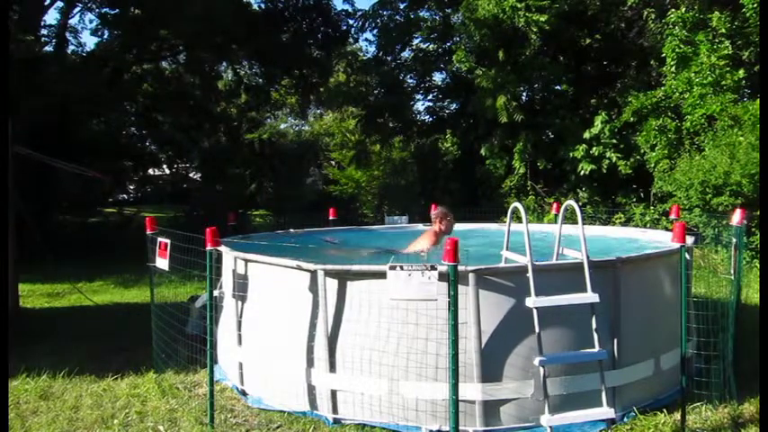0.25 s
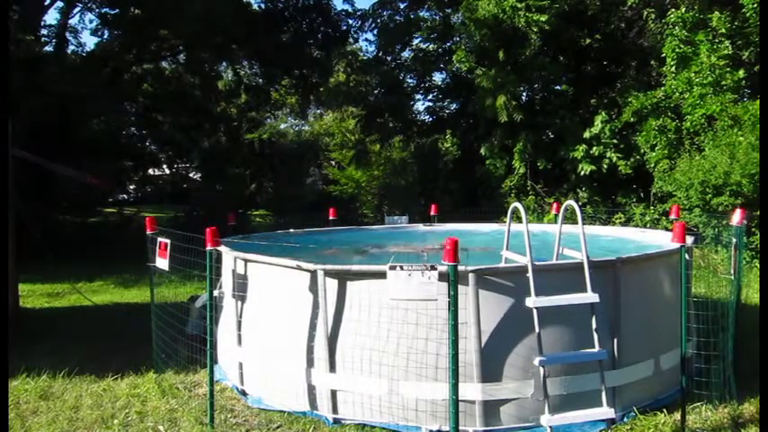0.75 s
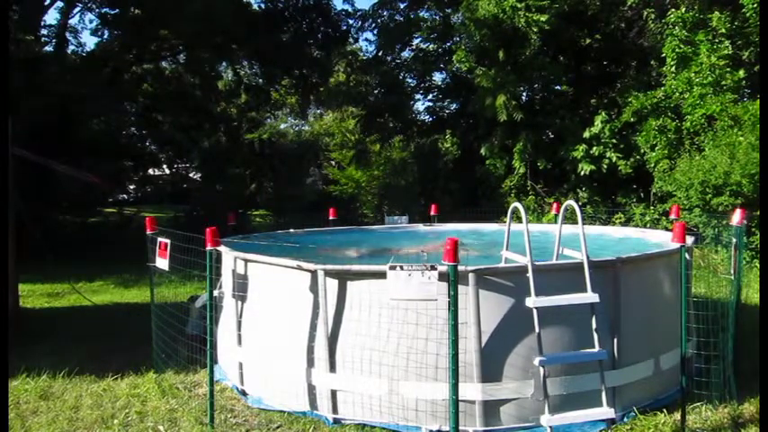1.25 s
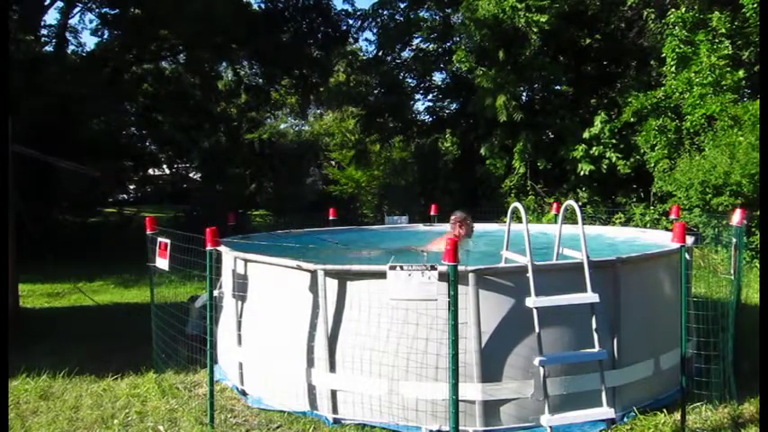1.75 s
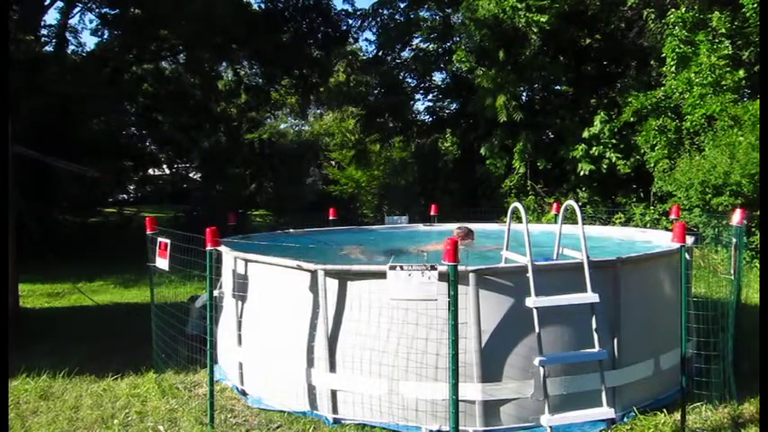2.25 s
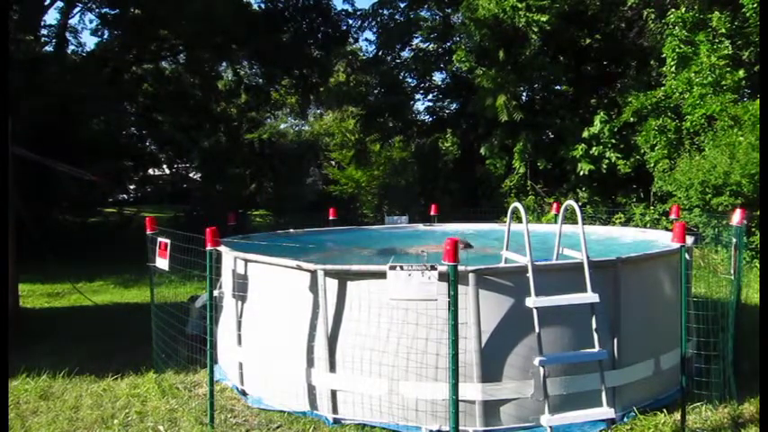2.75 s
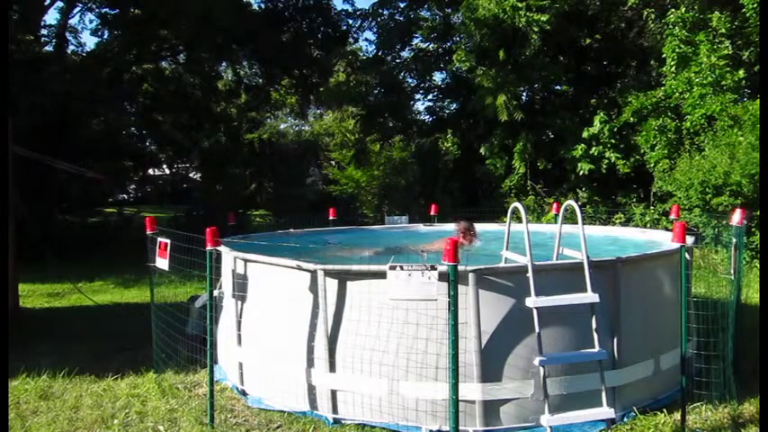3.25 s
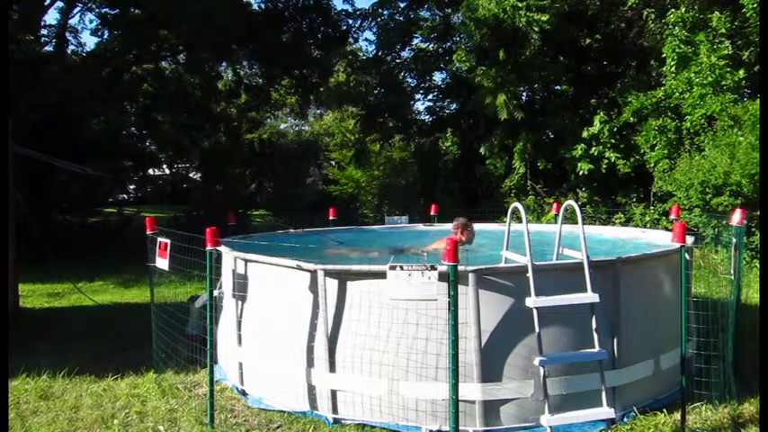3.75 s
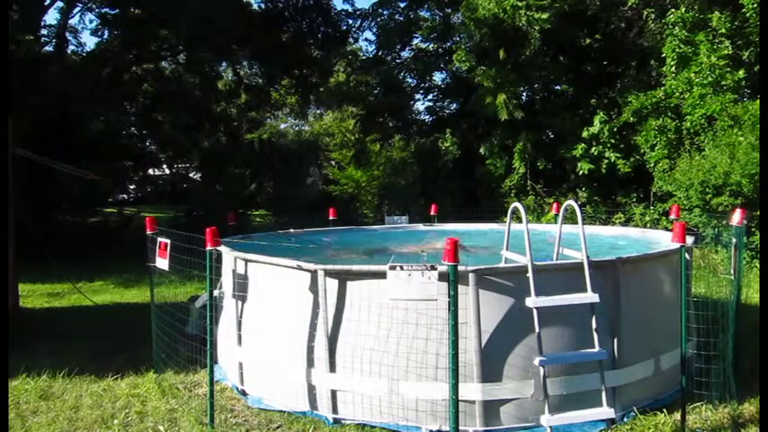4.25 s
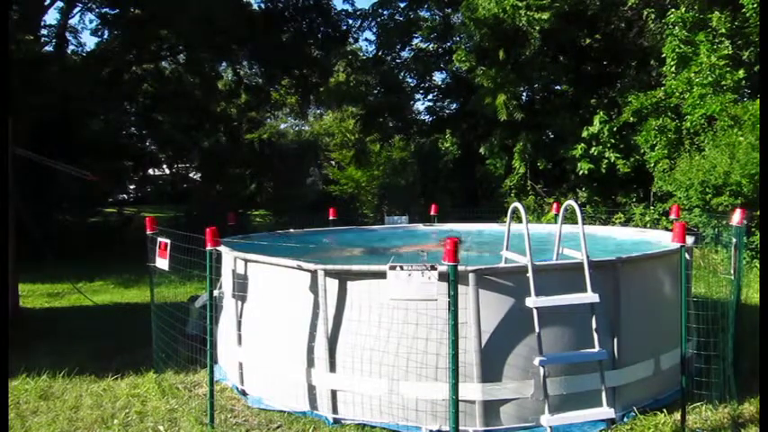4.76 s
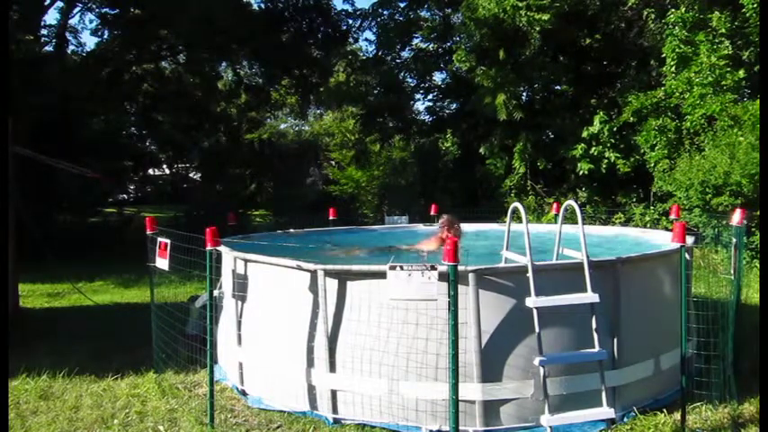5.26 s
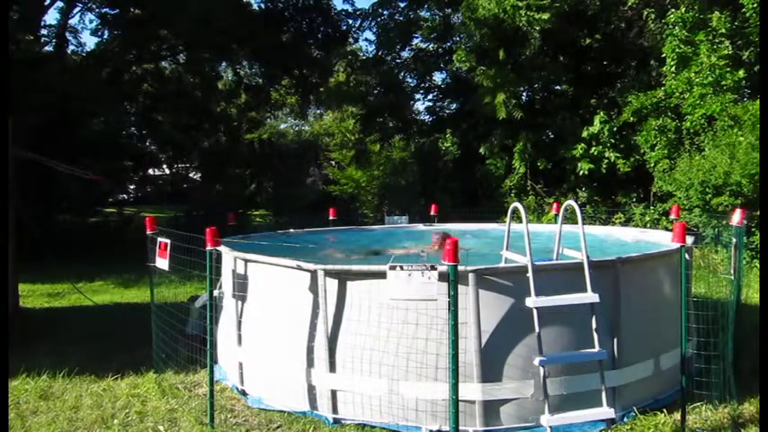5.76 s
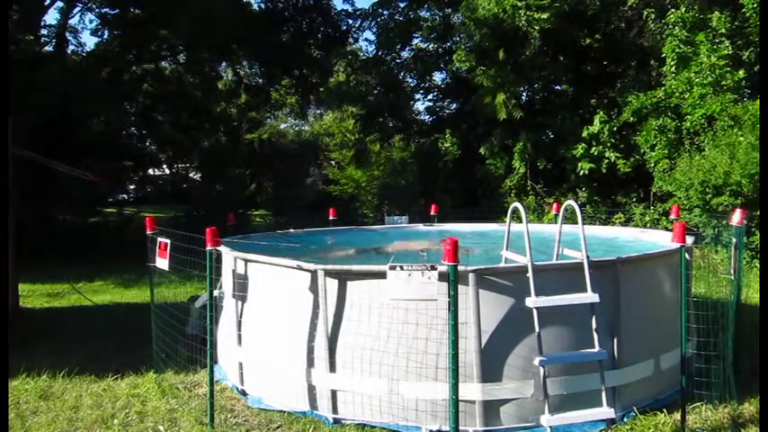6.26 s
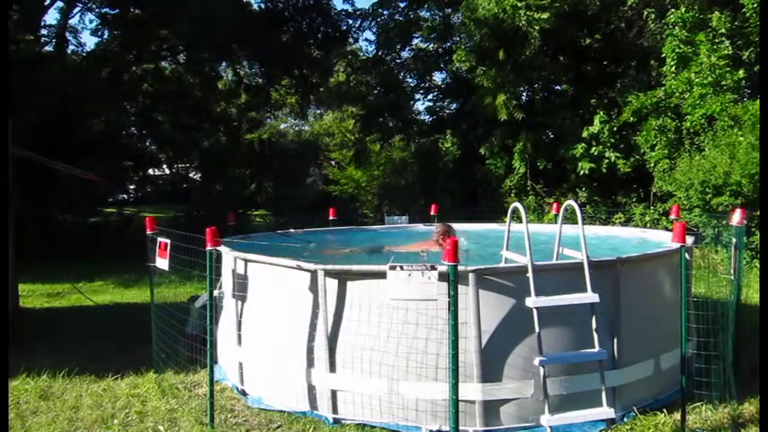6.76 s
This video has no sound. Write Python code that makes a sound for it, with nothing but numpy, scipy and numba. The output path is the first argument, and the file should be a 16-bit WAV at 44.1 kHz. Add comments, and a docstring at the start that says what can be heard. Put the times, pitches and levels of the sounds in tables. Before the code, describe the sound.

Outdoor stereo sound at moderate distance: splashing strokes in a small pool, with bright plinking drops, hissing spray and occasional bubble pops. Activity is frequent at first, pauses near three seconds, surges again, then thins before one last sharp splash. A bird repeats quick falling chirps to the right, a farther one whistles briefly, and another answers on the left. Low pump hum and rumble stay faint.

```python
"""Drops smack the water at once, spray fizzes and air pockets burst as a swimmer strokes on the spot
in a garden pool, heard from across the lawn; three birds sing and a pump hums over far rumble.
Drops and air pockets are damped sines of rising pitch, foam and garden air are banded noise.
Bird notes are gliding near-sines with scattered echoes; the pump is a set of wavering hum lines."""
import sys
import numpy as np
from scipy import signal
from scipy.io import wavfile
from numba import njit

SR = 44100
rng = np.random.default_rng(int(sys.argv[2]) if len(sys.argv) > 2 else 0)


def pcm_store(signal):
    """Save signal as 16-bit PCM."""
    levels = np.round(np.clip(np.atleast_2d(signal), -1, 1) * 32767)
    wavfile.write(sys.argv[1], SR, levels.astype(np.int16).T)


N = 309582

# Table levels are relative: the functions add their own gains.
# Drops and slaps on the surface: (time [s], peak level [dB], starting pitch [Hz])
SLAPS = [(0.0113, -22, 1510), (0.0486, -11.5, 3640), (0.2089, -24, 3860), (0.3298, -21, 3940),
         (0.337, -24, 2020), (0.4518, -26, 1220), (0.504, -24, 3460), (0.5541, -26.5, 3900),
         (0.637, -30, 4300), (0.6468, -13, 3994), (0.725, -18.5, 1230), (0.7791, -23, 4700),
         (0.7913, -25, 2540), (0.9403, -16.5, 3360), (1.0207, -24, 4940), (1.1175, -19.5, 2620),
         (1.1747, -25, 3160), (1.2, -25.5, 2470), (1.3132, -28, 2840), (1.4496, -21.5, 4030),
         (1.456, -25, 4500), (1.6903, -19.5, 3370), (1.7128, -26, 3420), (1.7407, -24, 1250),
         (1.8043, -17.5, 3250), (1.832, -18.5, 2000), (1.8477, -18, 3050), (1.9458, -25, 3190),
         (1.979, -17, 3660), (2.1259, -27, 3080), (2.1929, -20.5, 1980), (2.2015, -18, 3200),
         (2.2068, -17.5, 3180), (2.2495, -24, 2780), (2.3202, -16, 2330), (2.331, -22, 3380),
         (2.476, -21.5, 3600), (2.489, -27, 2900), (2.7317, -24, 3300), (3.3605, -19.5, 3100),
         (3.4421, -16.5, 1560), (3.4708, -11.5, 2950), (3.4755, -15, 3740), (3.5124, -12, 4160),
         (3.5299, -22, 2750), (3.571, -17, 3750), (3.6571, -19, 3280), (3.6717, -18.5, 4040),
         (3.7798, -27, 3980), (3.8232, -20, 4650), (3.8346, -19.5, 3460), (4.0447, -27, 5530),
         (4.135, -20.5, 3000), (4.2148, -20, 2780), (4.4092, -22, 2960), (5.162, -22, 2440),
         (5.232, -12, 3340), (5.2799, -21.5, 4820), (5.3592, -19, 4230), (5.5544, -16, 3800),
         (5.8207, -21, 4900), (5.8258, -17.5, 3120), (6.041, -23.5, 2900), (6.2103, -22, 2880),
         (6.256, -23, 2620), (6.306, -22.5, 2620), (6.8753, -24, 2780), (6.986, -15, 4770),
         (6.9912, -10.5, 3370)]
# Large bubbles bursting: (time [s], peak level [dB], starting pitch [Hz])
BURSTS = [(0.191, -32.5, 750), (0.42, -40, 380), (0.465, -37, 425), (0.525, -33, 830), (0.853, -31.5, 900),
          (1.58, -46, 274), (1.627, -39, 680), (1.66, -36, 860), (1.73, -38, 637), (1.826, -31, 593),
          (1.914, -35, 676), (3.113, -42, 268), (3.145, -44, 613), (3.179, -43, 514), (3.206, -32.5, 440),
          (3.654, -26, 883), (3.714, -34, 810), (3.824, -25.5, 672), (4.232, -29.5, 933),
          (5.186, -27, 1440), (5.298, -25, 1470), (5.383, -32, 535), (6.287, -38, 500), (6.64, -39, 328),
          (6.677, -35, 446), (6.75, -35, 345), (6.95, -24, 1180)]
# Air pockets that whoop far upward as they open: (time [s], peak level [dB], starting pitch [Hz])
WHOOPS = [(.492, -35.5, 594), (.863, -31, 690), (1.045, -34, 715), (1.138, -33, 935), (1.303, -37, 844),
          (4.898, -38, 270), (5.022, -39.5, 325)]
# Hard, bright snaps of water on water: (time [s], peak level [dB])
SNAPS = [(0.6464, -32), (0.7282, -40), (0.945, -33), (1.7968, -40), (2.1979, -33), (2.7312, -41),
         (3.657, -29), (3.8357, -37), (4.407, -35), (6.9735, -41)]
# Strokes and kicks that keep the water stirred: (time [s], hold [s], spray level [dB])
STROKES = [(0.05, 0.54, -46.5), (.7, 0.47, -46.5), (1.721, 0.82, -42.5), (3.38, 0.35, -47),
           (4.2, 0.37, -48.5), (5.12, 0.32, -45.5), (5.6, 0.37, -51.5), (5.9, 0.51, -49),
           (6.92, 0.064, -41)]
STROKE_RISE_DB_PER_S, STROKE_FALL_DB_PER_S = 113, 108
# Sheets of thrown water falling back: (time [s], spray level [dB])
SHEETS = [(0.073, -35), (.19, -48), (0.796, -34), (.96, -41.5), (1.857, -34), (2.018, -39.5), (2.2, -44),
          (2.326, -52), (2.62, -45.5), (2.735, -41), (3.392, -41.5), (3.46, -41), (3.52, -38),
          (3.68, -41.5), (3.859, -43.5), (4.23, -38), (5.192, -38.5), (5.56, -45.5), (5.979, -39),
          (6.095, -42), (6.221, -41.5), (6.345, -45), (6.99, -44.5)]
SHEET_RISE_DB_PER_S, SHEET_FALL_DB_PER_S = 222, 208
CALM_DB = -58  # spray between strokes
# Runs of air pockets rising: (time [s], hold [s], level [dB])
GURGLES = [(.46, 0.17, -50), (.92, 0.21, -51), (1.77, 0.25, -49), (2.1, 0.054, -48), (3.14, 0.11, -44),
           (4.88, 0.26, -52.5), (6.64, 0.13, -46)]
GURGLE_RISE_DB_PER_S, GURGLE_FALL_DB_PER_S, GURGLE_CALM_DB = 195, 125, -58
# Spectrum of the foam, also the colour of the fine bubbles: (frequency [Hz], level [dB per Hz])
SPRAY_SPECTRUM = [(300, -19), (500, -3), (800, 4), (1500, 1), (2900, 6.5), (4200, 3), (6300, -6),
                  (7400, -8), (9100, -20), (15500, -24.5)]
# Phrase of five notes, bird on the left; each note: (time in phrase [s], pitch [Hz], level [dB])
LEFT_PHRASE = [
    [(.003, 3160, -1), (.011, 3384, 0.5), (.024, 3490, -4)],
    [(.024, 3054, 1), (.035, 2654, -3.5), (.052, 2280, -6)],
    [(.076, 2300, -3), (.089, 2703, 0.5), (.101, 2840, -6)],
    [(.099, 4053, 1), (.121, 4114, 4.5), (.134, 3520, 4.5), (.154, 3020, 11.5)],
    [(.188, 2468, -6), (.202, 2390, -0.5), (.215, 2086, -7.5), (.24, 1660, -9)],
]
# Phrases of the left bird, the first lacking its three opening notes: (time [s], level [dB])
LEFT_SONGS = [(4.33, -31.5), (4.695, -29), (5.057, -26.5), (5.422, -28)]
# Slur down and quick chip, bird on the right; each note: (time in phrase [s], pitch [Hz], level [dB])
RIGHT_PHRASE = [
    [(0, 2617, 6), (.016, 2505, 3.5), (.026, 2250, 7), (.042, 2070, -2)],
    [(.03, 3700, -6), (.045, 3550, 5), (.051, 2934, 8), (.059, 2500, 2)],
]
# Phrases of the right bird: (time [s], level [dB])
RIGHT_SONGS = [(2.298, -36), (2.424, -38), (2.551, -35.5), (2.678, -35.5), (2.815, -35.5), (2.97, -37),
               (3.14, -38)]
# Plain whistles of a farther bird:
# (time [s], length [s], first pitch [Hz], last pitch [Hz], first level [dB])
WHISTLES = [(3.02, 0.25, 3030, 3015, -52), (3.943, 0.057, 3060, 3050, -42),
            (4.034, 0.052, 3040, 2995, -45.5)]
WHISTLE_FADE_DB = 4  # over each note
# Hum lines of the pump: (frequency [Hz], level [dB])
HUM_LINES = [(150.5, -2), (118.4, -10), (238.8, -9), (418.4, -1)]
# Course of the pump and low rumble: (time [s], level [dB])
PUMP_COURSE = [(0, -59), (2, -60), (3, -56), (6.4, -57), (7.02, -59)]
# Spectrum of the garden air: (frequency [Hz], level [dB per Hz])
GARDEN_SPECTRUM = [(40, -6), (133, -6), (284, -7.5), (425, -5), (710, -6), (1730, -8), (3300, -6),
                   (6660, -17.5), (9200, -18), (15800, -43)]
GARDEN_DB = -45
# Likeness of left and right noise: (frequency [Hz], correlation [-1 to 1])
LIKENESS = [(28, 0.25), (60, 0.9), (200, 0.57), (1650, 0.64), (5000, -0.37), (9000, -0.43), (15000, -0.55)]
# Balance of the two sides: (frequency [Hz], left minus right [dB])
TILT = [(30, 3.5), (120, 0), (700, -0.3), (2000, -3.5), (5000, 3), (9000, 5.5), (15000, -20)]
CUTOFF_HZ = 15850


def water():
    """Superposition: foam hiss, swarms of bubbles and single smacks add as independent sources."""
    spray_db, gurgle_db = stirring()
    foam = amp(spray_db - 3.0) * banded_noise(SPRAY_SPECTRUM, patchy_db=1.0)
    fizz = swarm(spray_db + 3.0, 917, 8380, 2600, 9.2, 1.8, 3.2, 0.067, SPRAY_SPECTRUM, count=30000)
    plinks = swarm(spray_db + 2.5, 570.8, 5180, 500, 29.6, 4.4, 1.2, 0.048, SPRAY_SPECTRUM, count=5000)
    gurgle_colour = [(200, -8.0), (1000, -2.0)]  # (frequency [Hz], level [dB])
    gurgle = swarm(gurgle_db - 0.8, 202.4, 796, 400, 12.9, 4.0, 0.68, 0.06, gurgle_colour, count=2000)
    smacks = struck(SLAPS, lift_db=7.0, cycles=8.04, taper=0.57, rise=0.035,
                    after_s=.012, after_db=9.5, count=5)
    bursts = struck(BURSTS, lift_db=7.0, cycles=29.0, taper=0, rise=0.071,
                    after_s=0, after_db=0, count=1)
    whoops = struck(WHOOPS, lift_db=3.5, cycles=25.0, taper=-0.8, rise=0.39,
                    after_s=0, after_db=0, count=1)
    snaps = cracks(SNAPS, level_db=-3.5, low_hz=5500, t60=0.023)
    drops = fizz + plinks + gurgle + smacks + bursts + whoops + snaps
    # the pool wall and the rippled surface smear every drop a little
    smear = amp(-10.5) * scattered(drops, t60=0.03, first=.0013, channels=1)
    return foam + drops + smear


def stirring():
    """Addition of power: strokes and sheets over a calm floor make the spray level in dB;
    air-pocket runs over another floor make the gurgle level."""
    s, db = np.transpose(SHEETS)
    strokes = swell(*np.transpose(STROKES), STROKE_RISE_DB_PER_S, STROKE_FALL_DB_PER_S)
    sheets = swell(s, 0, db, SHEET_RISE_DB_PER_S, SHEET_FALL_DB_PER_S)
    spray = strokes + sheets + amp(CALM_DB) ** 2
    gurgle = swell(*np.transpose(GURGLES), GURGLE_RISE_DB_PER_S, GURGLE_FALL_DB_PER_S)
    gurgle = gurgle + amp(GURGLE_CALM_DB) ** 2
    return 10 * np.log10(spray), 10 * np.log10(gurgle)


def swell(s, held_s, db, rise, fall):
    """Exponential growth and decay: powers that rise, hold and fall in straight dB ramps add up."""
    t = np.arange(0, N / SR + .002, .001)[:, None]
    before = np.maximum(s - t, 0)
    after = np.maximum(t - s - held_s, 0)
    power = amp(db - rise * before - fall * after) ** 2
    return np.interp(np.arange(N) / SR, t[:, 0], power.sum(1))


def swarm(level_db, low_hz, high_hz, per_s, cycles, uneven_db, clump_db, rise, colour, count):
    """Random births: bubbles clump in time and spread in log pitch, a few far stronger than most."""
    u = rng.random((count, 5))
    at = (u[:, 0] * N).astype(int)
    # per_s is the nominal birth rate, ahead of the clumping; count candidates are drawn
    chance = per_s * N / SR / count * amp(clump_db * drift(14))
    born = u[:, 1] < chance[at]
    hz = low_hz * (high_hz / low_hz) ** u[:, 2]
    strength_db = uneven_db * np.minimum(-np.log(u[:, 3]), 3.0)
    size = born * amp(strength_db + at_hz(colour, hz)) * hz
    x = bubbles(u[:, 0] * N / SR, size, hz, cycles * (.5 + u[:, 4]), rise, onset=1.96, spread_db=1.0)
    return amp(level_db) * rms_one(x)


def struck(table, lift_db, cycles, taper, rise, after_s, after_db, count):
    """Impact resonance: each listed bubble leads a crown of count - 1 weaker ones at other pitches.

    cycles holds at 1 kHz and scales as pitch to the power taper."""
    s, peak_db, hz = np.transpose(table)[:, :, None]
    follower = np.arange(count) > 0  # the first is the listed one
    u = rng.random((len(table), count, 4)) * follower[:, None]
    s = np.minimum(s + after_s * u[..., 0], (N - 1) / SR)
    hz = hz * 2.1 ** (u[..., 1] - u[..., 2])
    size = amp(peak_db + lift_db - after_db * (u[..., 3] + 0.5 * follower))
    ringing = cycles * (hz.ravel() / 1000) ** taper
    return bubbles(s.ravel(), size.ravel(), hz.ravel(), ringing, rise, onset=4.12, spread_db=1.5)


def bubbles(s, size, hz, cycles, rise, onset, spread_db):
    """Level difference between the sides: each bubble lies a little left or right over the pool."""
    out = np.zeros((2, N))
    pan_db = at_hz(TILT, hz) + spread_db * rng.standard_normal(len(s))
    add_bubbles(out, (s * SR).astype(np.int64), size, hz / SR, np.maximum(cycles, 1.5), rise, onset,
                amp(pan_db / 2), amp(-pan_db / 2))
    return out


@njit
def add_bubbles(out, at, size, step, cycles, rise, onset, left, right):
    """Damped oscillation: a soft-started sine whose pitch climbs as the bubble nears the surface."""
    for k in np.flatnonzero(size):
        phase = 0.0
        fall = np.log(1000) * step[k] / cycles[k]  # 60 dB down after this many starting periods
        for i in range(min(int(6 / fall), out.shape[1] - at[k])):
            soft_start = (1 - np.exp(-onset * fall * i)) ** 2
            v = size[k] * np.sin(phase) * np.exp(-fall * i) * soft_start
            out[0, at[k] + i] += left[k] * v
            out[1, at[k] + i] += right[k] * v
            phase += 2 * np.pi * step[k] * (1 + rise * fall * i)


def cracks(table, level_db, low_hz, t60):
    """Impulsive excitation: short bright spits of noise with exponential decay."""
    s, peak_db = np.transpose(table)
    clicks = np.zeros(N)
    clicks[(s * SR).astype(int)] = amp(peak_db + level_db)
    envelope = signal.lfilter([1], [1, -amp(-60 / (t60 * SR))], clicks + 1e-18)
    spit = envelope * rng.standard_normal((2, N))
    return signal.sosfilt(signal.butter(2, low_hz, "high", fs=SR, output="sos"), spit)


def birds():
    """Spatial separation: three singers differ in side, arrival lag and share of echo."""
    whistles = [[(s, first_hz, db), (s + length, last_hz, db - WHISTLE_FADE_DB)]
                for s, length, first_hz, last_hz, db in WHISTLES]
    left = sing(LEFT_PHRASE[3:], LEFT_SONGS[:1]) + sing(LEFT_PHRASE, LEFT_SONGS[1:])
    right = sing(RIGHT_PHRASE, RIGHT_SONGS)
    far = sing(whistles, [(0.00053, 0)])  # sung once, 0.53 ms after the listed times
    return (among_trees(left, pan_db=3.5, lag=3.63, echo_db=-2.5, t60=0.84)
            + among_trees(right, pan_db=-4.5, lag=-6.5, echo_db=-2.0, t60=0.57)
            + among_trees(far, pan_db=-25.5, lag=-7.0, echo_db=7.5, t60=0.19))


def sing(notes, songs):
    """Frequency modulation: near-sine notes glide, with soft ends, once for each (start, level)."""
    out = np.zeros(N)
    waver = 0.4 * drift(71)  # radians; the long path through moving air roughens the pitch
    for start, level_db in songs:
        for note in notes:
            s, hz, db = np.transpose(note)
            t = np.arange(s[0], s[-1], 1 / SR)
            at = round((start + s[0]) * SR)
            phase = 2 * np.pi * np.cumsum(np.interp(t, s, hz)) / SR
            tone = np.sin(phase + waver[at:at + len(t)])
            gain = amp(level_db + np.interp(t, s, db))
            out[at:at + len(t)] += gain * tone * signal.windows.tukey(len(t), .3)
    return out * amp(2.5 * drift(120))  # stirring air and leaves make the notes flutter


def among_trees(song, pan_db, lag, echo_db, t60):
    """Interaural delay and scattering: the right side hears the bird lag samples later (earlier if
    negative); trunks and walls scatter it back from all round."""
    # near leaves blur the notes
    blur = amp(-8.0) * scattered(song[None], t60=0.04, first=.0005, channels=1)[0]
    song = amp(-3.5) * (song + blur)
    late = np.interp(np.arange(N) - lag, np.arange(N), song)
    direct = np.array([amp(pan_db / 2) * song, amp(-pan_db / 2) * late])
    echo_gain = amp(echo_db + 2.8 * np.array([drift(40), drift(42)]))
    return direct + echo_gain * scattered(song[None], t60, first=0.0016, channels=2)


def pump():
    """Line spectrum over broadband noise: wavering hum and low rumble share one level course."""
    t = np.arange(N) / SR
    hum = 0
    for hz, db in HUM_LINES:
        level = np.sqrt(2) * amp(db + 1.2 * drift(0.98))
        hum = hum + level * np.sin(2 * np.pi * hz * t + (hz / 600) ** 2 * drift(6.6))
    rumble_spectrum = [(25, -30), (62, 5.0), (110, 0.5), (200, -15.0), (400, -45)]  # ([Hz], [dB per Hz])
    rumble = banded_noise(rumble_spectrum, patchy_db=2.0)
    course = amp(np.interp(t, *np.transpose(PUMP_COURSE)))
    return course * (amp(-3.0) * hum + amp(-4.5) * rumble)


def garden_air():
    """Broadband ambience: shaped noise whose bands flicker in level."""
    return amp(GARDEN_DB) * banded_noise(GARDEN_SPECTRUM, patchy_db=3.0)


def banded_noise(spectrum, patchy_db):
    """Partial coherence: half-octave noise bands with own level, flicker and likeness; rms 1."""
    out, together = 0, drift(9)
    edges = 24 * 2 ** np.arange(0, 9.6, .5)
    white = rng.standard_normal((2, 2, N))  # neighbouring bands draw on different noise
    sides = np.array([[1], [-1]])
    for k, (low, high) in enumerate(zip(edges, edges[1:])):
        band = signal.butter(2, [low, high], "band", fs=SR, output="sos")
        mid, side = signal.sosfilt(band, white[k % 2])
        hz = np.sqrt(low * high)
        alike = np.clip(at_hz(LIKENESS, hz), -1, 1)
        gain = amp(at_hz(spectrum, hz) + patchy_db * (0.4 * together + drift(22)))
        stereo = np.sqrt(1 + alike) * mid + np.sqrt(1 - alike) * side * sides
        out = out + gain * stereo * amp(at_hz(TILT, hz) / 2 * sides)
    return rms_one(out)


def scattered(x, t60, first, channels):
    """Diffuse reflection: dense decaying echoes of equal energy, one pattern for both sides or two."""
    t = np.arange(round(.6 * SR)) / SR
    shape = (channels, len(t))
    taps = rng.standard_normal(shape) * (rng.random(shape) < .06) * amp(-60 * t / t60) * (t > first)
    taps = taps / np.sqrt(np.sum(taps ** 2, 1, keepdims=True))
    return signal.fftconvolve(x, taps, axes=1)[:, :N]


def drift(rate):
    """Low-passed chance: noise at every 40th sample through two poles at rate Hz; rms 1."""
    r = np.exp(-80 * np.pi * rate / SR)
    slow = signal.lfilter([1], [1, -2 * r, r * r], rng.standard_normal(N // 40 + 2002))[2000:]
    return np.interp(np.arange(N) / 40, np.arange(len(slow)), rms_one(slow))


def at_hz(points, hz):
    """Logarithmic frequency scale: a spectrum is read between its points."""
    f, value = np.array(points).T[:2]
    return np.interp(np.log(hz), np.log(f), value)


def rms_one(x):
    """Effective value: the signal is scaled to rms 1."""
    return x / np.sqrt(np.mean(x ** 2) + 1e-20)


def amp(db):
    """Decibel law: dB to amplitude gain."""
    return 10 ** (np.asarray(db) / 20)


def scene():
    """Superposition of water, birds, pump and garden air."""
    return water() + birds() + pump() + garden_air()


def record(dry):
    """Linear filtering: a deep, narrow dip near 8 kHz; the top is cut."""
    dry = signal.lfilter(*signal.iirnotch(8250, 3.0, SR), dry)
    return signal.sosfilt(signal.ellip(12, .5, 70, CUTOFF_HZ, fs=SR, output="sos"), dry)


dry = scene()
out = record(dry)
pcm_store(out)
```